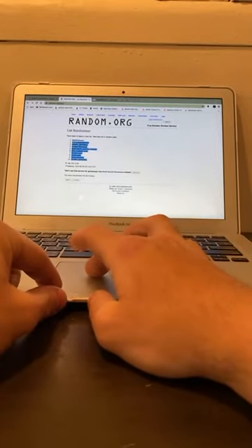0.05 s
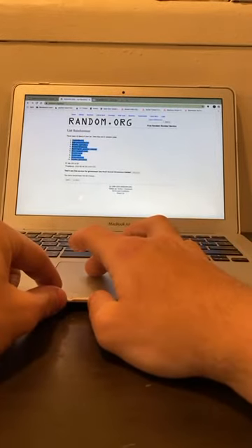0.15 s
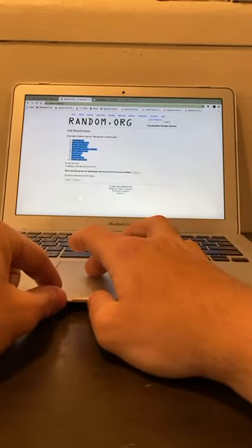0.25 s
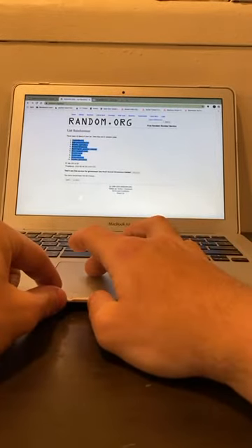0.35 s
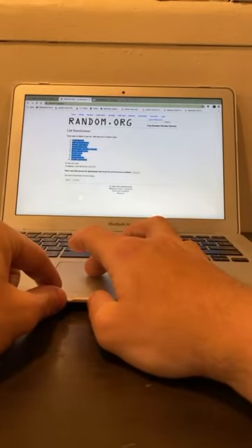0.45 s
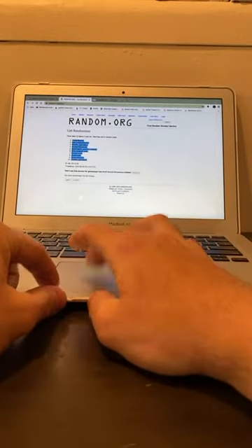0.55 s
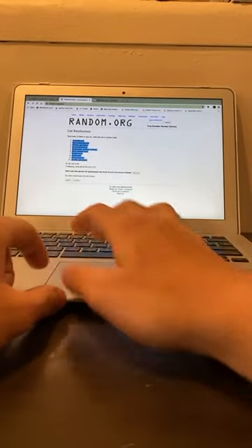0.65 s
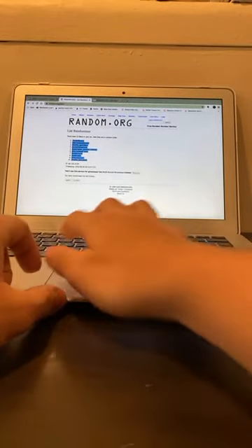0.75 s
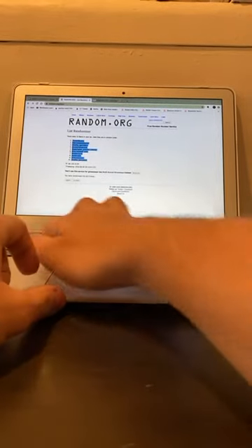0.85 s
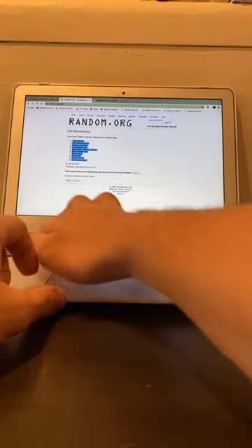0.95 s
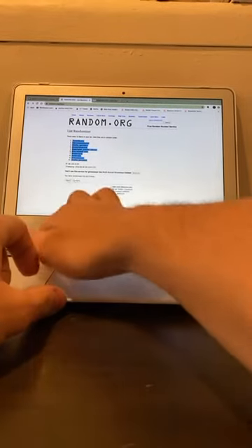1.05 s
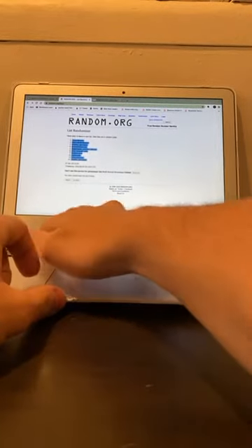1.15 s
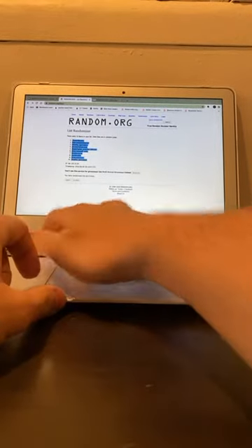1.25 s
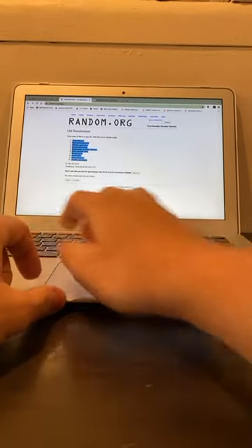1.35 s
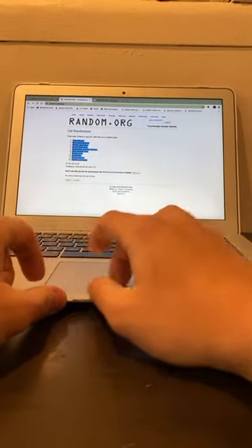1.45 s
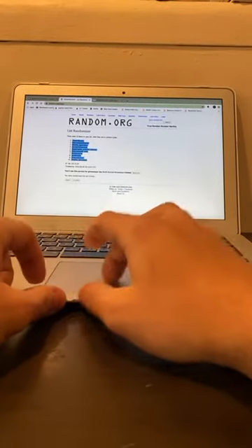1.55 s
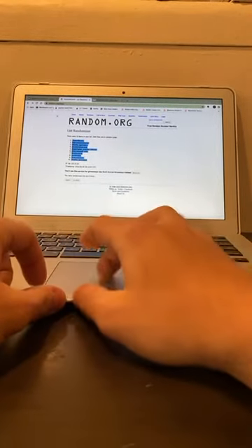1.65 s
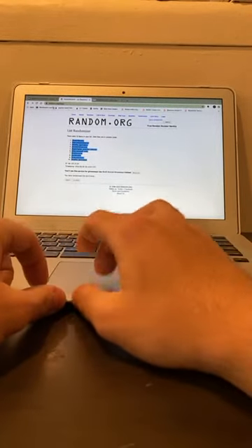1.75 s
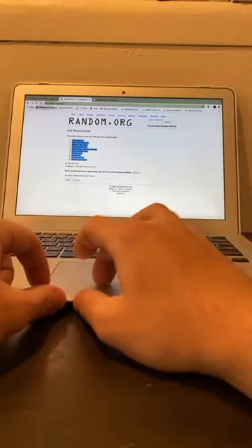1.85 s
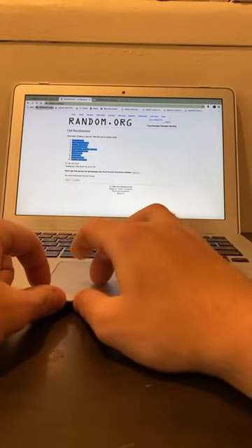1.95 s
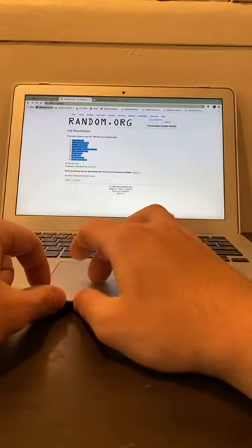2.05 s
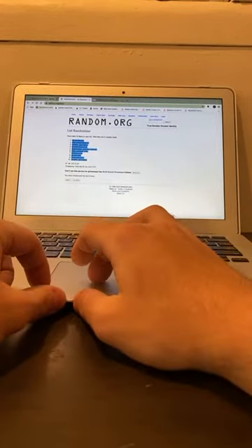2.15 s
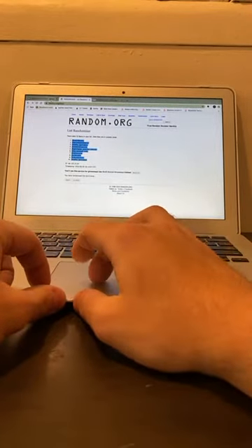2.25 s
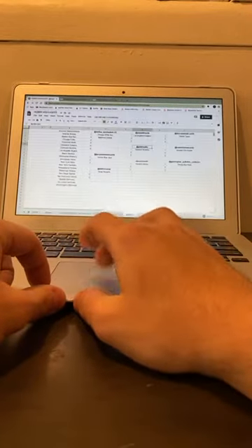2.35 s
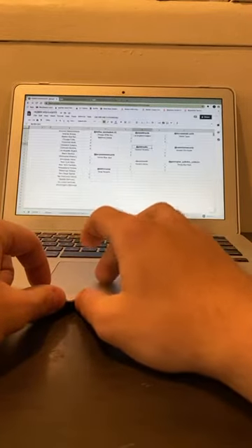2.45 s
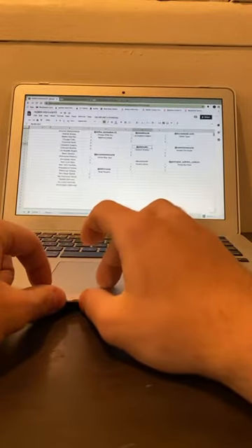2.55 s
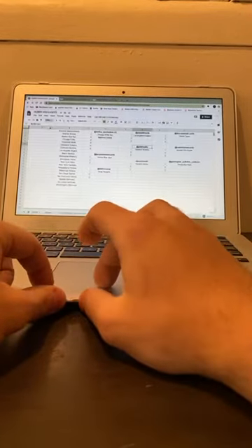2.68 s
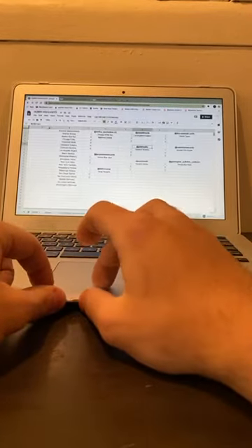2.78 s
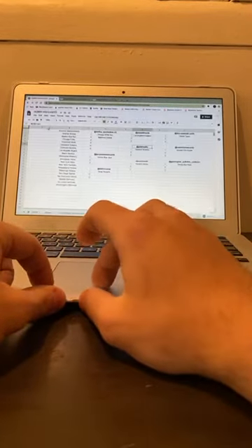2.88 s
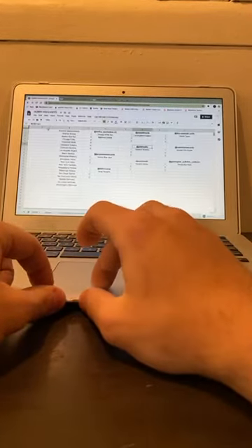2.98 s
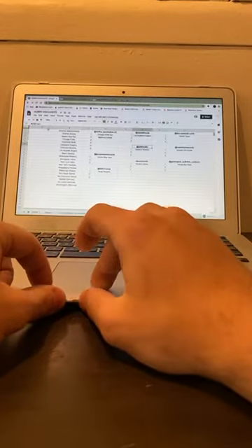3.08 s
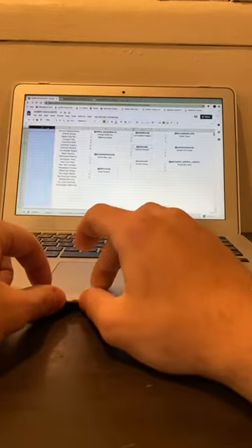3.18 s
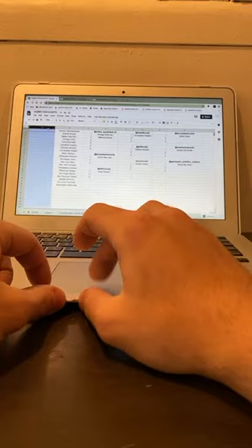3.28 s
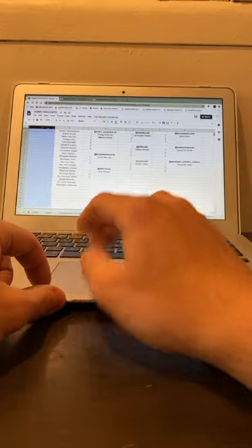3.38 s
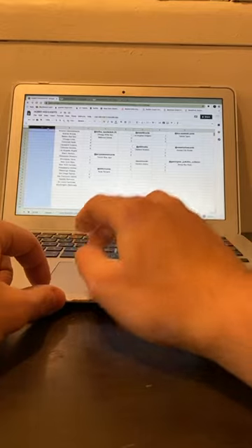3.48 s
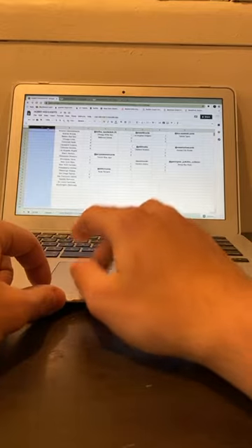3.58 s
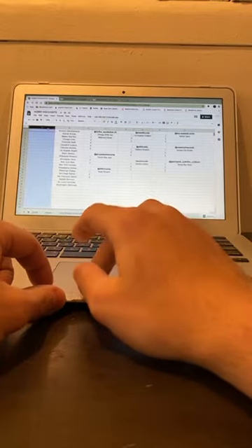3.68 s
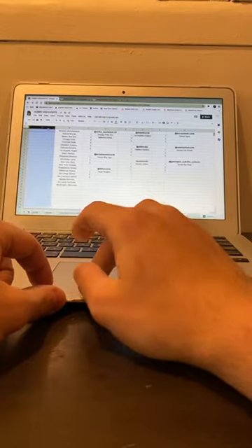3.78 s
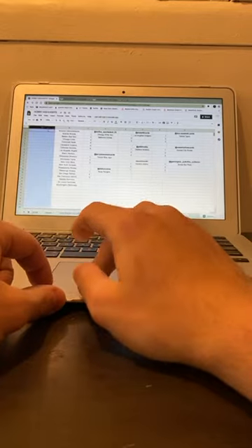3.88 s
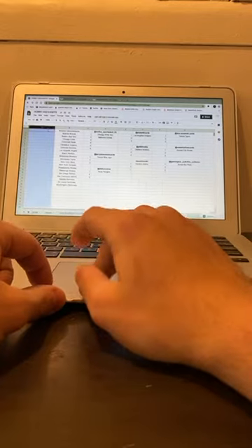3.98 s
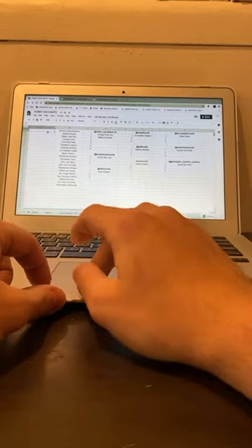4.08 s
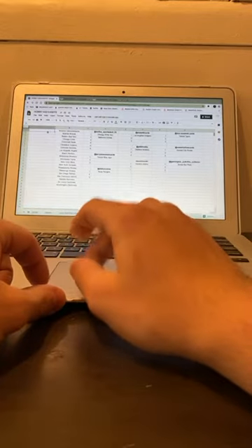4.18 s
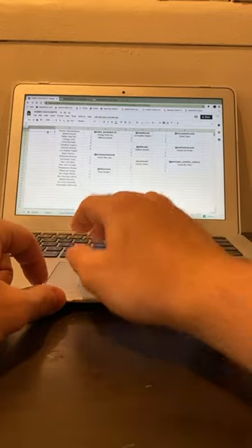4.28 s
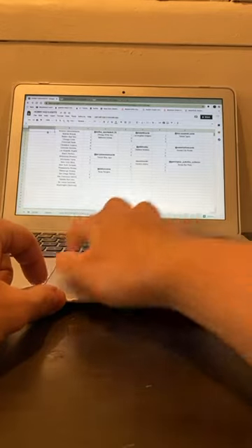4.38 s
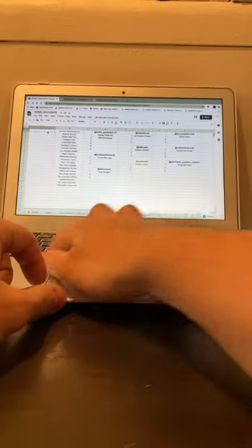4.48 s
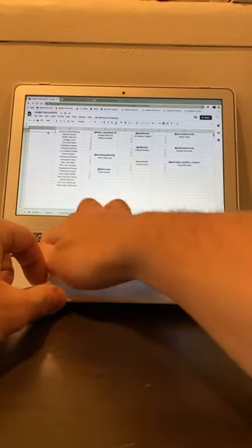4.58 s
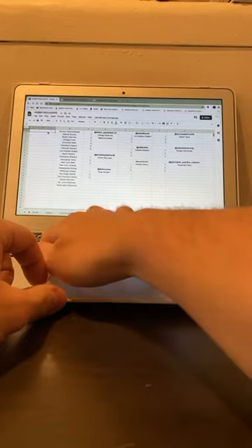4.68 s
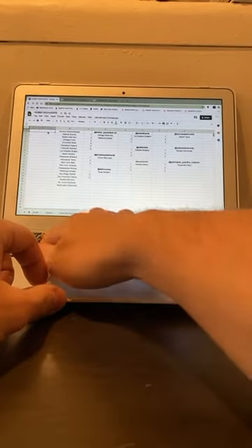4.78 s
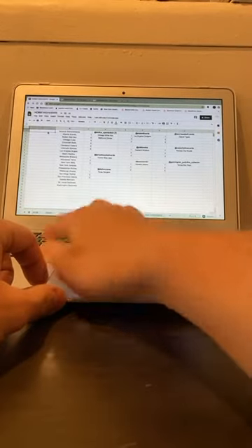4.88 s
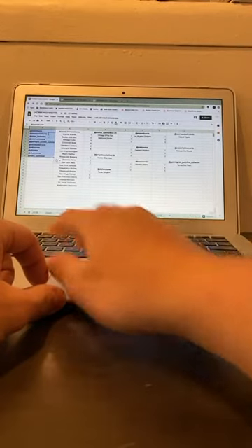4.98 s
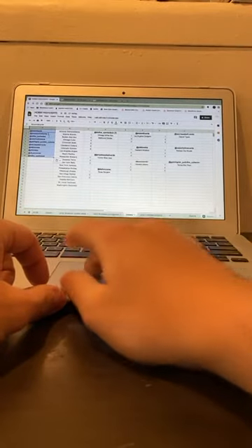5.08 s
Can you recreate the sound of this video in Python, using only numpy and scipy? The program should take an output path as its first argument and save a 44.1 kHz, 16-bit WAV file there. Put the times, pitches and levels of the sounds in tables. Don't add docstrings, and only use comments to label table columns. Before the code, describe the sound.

Sparse laptop key presses, three crisp trackpad clicks, dry skin slides and soft desk thumps in a quiet room with a low pulsing hum.

```python
import sys
import numpy as np
from scipy import signal
from scipy.fft import rfft, irfft
from scipy.io import wavfile
from scipy.ndimage import uniform_filter1d

SR = 44100
rng = np.random.default_rng(int(sys.argv[2]) if len(sys.argv) > 2 else 0)


def inscribe(sig):
    pcm = np.round(np.clip(np.atleast_2d(sig).T, -1, 1) * 32767)
    wavfile.write(sys.argv[1], SR, pcm.astype(np.int16))


def decibels_to_gain(level_db):
    exponent = np.asarray(level_db, float) / 20
    return 10 ** exponent


N = 226363
TIME = np.arange(N) / SR


def unit(x):
    return x / np.sqrt(np.mean(x ** 2))


def colour(x, points):
    hz, db = np.transpose(points)
    bins = np.maximum(np.arange(len(x) // 2 + 1) * SR / len(x), 1)
    gain = decibels_to_gain(np.interp(np.log(bins), np.log(hz), db))
    return irfft(rfft(x) * gain, len(x))


def hiss(points):
    return unit(colour(rng.standard_normal(N), points))


def walk(rate):
    hold = int(SR / rate)
    steps = np.repeat(rng.standard_normal(N // hold + 1), hold)
    slewed = uniform_filter1d(uniform_filter1d(steps, hold), hold)
    return 1.3 * slewed[:N]


def fall(t60, t):
    return np.exp(-np.log(1000) * t / t60)


def ring(hz, t60, t):
    return np.sin(2 * np.pi * hz * t) * fall(t60, np.maximum(t, 0)) * (t > 0)


def add(out, s, x):
    i = int(s * SR)
    out[i:i + len(x)] += x[:N - i]


def trackpad():
    # snap in seconds, peak level in dB.
    snaps = [
        (2.0878, -32.5),
        (2.929, -34),
        (3.894, -34),
    ]
    # frequency in Hz, level in dB, t60 in seconds.
    plate = [(1010, -13, 0.058), (1110, -11, 0.063), (440.6, 0, 0.036), (2010, -1, 0.021),
             (2300, -8, 0.048), (3150, 8, 0.011), (3474, 0, 0.023), (4260, -3, 0.022), (5050, -3, 0.021),
             (5600, 5.5, 0.0092), (6680, -4, 0.009), (7440, -17, 0.0034), (8440, -6, 0.012),
             (11640, -4, 0.0036)]
    crack_colour = [(500, 2), (1500, 7.0), (3000, 3), (8500, 3.5), (11000, -13), (16000, -30)]
    out, t = np.zeros(N), TIME[:SR // 8]
    first_crack = np.exp(-t / 0.0032)
    bounce = 0.75 * np.exp(-np.abs(t - .009) / 0.0011)
    loose_tail = 0.21 * np.exp(-t / 0.028)
    shake = first_crack + bounce + loose_tail
    for s, db in snaps:
        modes = np.zeros(len(t))
        for hz, mode_db, t60 in plate:
            level_chance, pitch_chance = rng.standard_normal(2)
            late = 2.638 / hz
            pitch = hz * (1 + 0.0041 * pitch_chance)
            modes += decibels_to_gain(mode_db + 0.35 * level_chance) * ring(pitch, t60, t - late)
        crack = shake * unit(colour(rng.standard_normal(len(t)), crack_colour))
        add(out, s - .0004, decibels_to_gain(db + 1.5) * (modes / np.abs(modes).max() + decibels_to_gain(-13.5) * crack))
    return out


def keys():
    # time in seconds, peak level in dB, keycap ring in Hz, knock in dB.
    presses = [
        (1.0357, -36.5, 6100, -14.5),
        (1.0437, -37.5, 7760, -12),
        (4.3848, -44, 6670, -27),
        (4.3994, -44.5, 6500, -33),
        (4.629, -43.5, 8300, -19),
        (4.6382, -43.5, 8250, -35),
    ]
    # time in seconds, peak level in dB, keycap ring in Hz, knock in dB.
    releases = [
        (0.843, -47.5, 8100, -57),
        (0.8522, -61.5, 8000, -1.5),
        (1.129, -60, 7510, -5),
        (1.1348, -49, 7150, -19),
        (1.1688, -52.5, 6620, -19),
        (1.185, -66, 7870, -21),
        (4.7154, -63, 9200, -17),
        (4.7232, -51, 8300, -14),
        (4.7463, -57, 7200, -22),
    ]
    # time in seconds, peak level in dB, case ring in Hz, knock in dB.
    touches = [(0.2128, -54, 3180, -25), (0.377, -56, 4500, -18), (0.4438, -45, 3100, -20),
               (0.818, -46, 2640, -5.5), (1.638, -45, 2620, -30), (2.306, -54.5, 6000, -13),
               (2.3844, -55, 2730, -22), (3.275, -41, 3140, -17.5), (3.5764, -54, 4010, -20),
               (4.0307, -52, 6300, -25), (4.0914, -47, 2680, -20), (4.4944, -63.5, 4000, -2)]
    down = ticks(presses, ring_db=7.5, bright_db=-5, top_db=-10.5, rise=.0015, rattle=0.0077)
    up = ticks(releases, ring_db=5.5, bright_db=-4.5, top_db=-7.5, rise=0.0023, rattle=0.017)
    taps = ticks(touches, ring_db=4, bright_db=-15.5, top_db=-28, rise=.003, rattle=0.0051)
    return down + up + taps


def ticks(table, ring_db, bright_db, top_db, rise, rattle):
    out, t = np.zeros(N), TIME[:SR // 8]
    for s, db, hz, knock_db in table:
        noise = rng.standard_normal((3, len(t)))
        grit = noise[0] * decibels_to_gain(2.0 * unit(uniform_filter1d(noise[1], size=40)))
        shake = grit * np.exp(-t / max(rattle, .001)) * np.minimum(t / rise, 1)
        low = [(1200, -30), (2600, 0.23 * knock_db)]
        peak = [(0.98 * hz, 0), (hz, ring_db), (1.12 * hz, 0)]
        high = [(9300, bright_db), (10800, top_db), (16000, top_db - 11)]
        body = colour(shake, sorted(low + peak + high))
        thud = noise[2] * np.exp(-t / 0.0045) * np.minimum(t / 0.0032, 1)
        knock = colour(thud, [(400, -13), (750, -2), (1500, 1.5), (2400, -7), (3300, -25)])
        add(out, s - .001, decibels_to_gain(db) * (body + decibels_to_gain(knock_db + 18.0) * knock))
    return out


def pings():
    # start in seconds, level in dB, frequency in Hz, t60 in seconds.
    lone_modes = [(0.825, -49, 328, 0.18), (1.054, -56, 253, 0.67), (1.135, -60, 1407, .06),
                  (4.386, -54.5, 2380, 0.031), (4.388, -55, 5600, .04), (4.628, -54.5, 1660, 0.029),
                  (4.632, -46.5, 5050, 0.015), (4.639, -57, 8770, 0.035), (4.724, -58.5, 1410, 0.051),
                  (4.776, -54, 317, 0.19), (4.929, -58.5, 301, 0.14)]
    out, t = np.zeros(N), TIME[:SR // 3]
    for s, db, hz, t60 in lone_modes:
        soft_start = np.minimum(t * hz / 2, 1)
        add(out, s, decibels_to_gain(db) * ring(hz, t60, t) * soft_start)
    return out


def skin():
    # full speed from in seconds, held in seconds, level in dB, speed-up in seconds, dull part in dB.
    slides = [(.44, .05, -74.5, 0.11, 5.5), (.545, 0.07, -49, 0.082, -11.5), (.74, .28, -69.5, 0.18, 1),
              (1.32, 0.076, -54, 0.027, -16.5), (1.52, .09, -75.5, 0.053, -6),
              (1.645, 0.0042, -62.5, 0.014, -6), (3.347, 0.036, -61, 0.077, -15),
              (3.53, 0.084, -78, 0.038, -3), (4.164, 0.046, -52.5, 0.11, -19),
              (4.28, 0.054, -74, 0.027, -22), (4.42, 0.093, -72.5, .04, 0), (4.93, 0.11, -60, 0.044, -15)]
    # frequency in Hz, level in dB per Hz.
    skin_colour = [(1060, -17), (1800, -7.5), (2230, -8.5), (2550, -0.5), (3300, -3), (3660, 0.5),
                   (6450, -2.5), (7000, -1.5), (8290, -3), (10500, -14.5), (13600, -41), (22000, -120)]
    slow_down_s, swell_db = 0.052, 26.5
    arch_db = 2
    bright, dull = np.zeros((2, N))
    for s, held, db, speed_up, dull_db in slides:
        before = np.maximum((s - TIME) / speed_up, 0)
        after = np.maximum((TIME - s - held) / slow_down_s, 0)
        lost = np.minimum(before + after, 4)
        off_middle = np.minimum(np.abs(2 * (TIME - s) / held - 1), 1)
        drag = decibels_to_gain(db - swell_db * lost - arch_db * off_middle ** 2)
        bright += drag
        dull += decibels_to_gain(dull_db) * drag
    flutter = decibels_to_gain(.4 * walk(40))
    grain = flutter * decibels_to_gain(1.23 * walk(120) + 0.77 * walk(900))
    airy = decibels_to_gain(-16) * hiss([(8500, -49), (10000, -2), (14000, -9), (16000, -11)])
    bright_hiss = hiss(skin_colour) + airy
    dull_hiss = hiss([(250, 7.5), (600, 4), (2000, -3.0), (2600, -55)])
    return grain * (bright * bright_hiss + dull * dull_hiss)


def squeak():
    # start in seconds, held in seconds, pitch in Hz, level in dB.
    squeaks = [
        (.74, .3, 4300, -78),
        (.78, .12, 8450, -75),
        (3.95, .34, 4620, -84),
    ]
    # (share of the pitch, dB)
    shape = np.array([(.9, -40), (.975, -10), (1, 0), (1.025, -10), (1.1, -40)])
    out = np.zeros(N)
    for s, length, hz, db in squeaks:
        fade = np.clip(np.minimum(TIME - s, s + length - TIME) / .03, 0, 1)
        out += decibels_to_gain(db) * fade * hiss(shape * [hz, 1])
    patchy = decibels_to_gain(1.2 * walk(74))
    return patchy * out


def desk():
    # push in seconds, peak level in dB, legs in dB, case in dB.
    blows = [(0.395, -53, 9.5, -10), (0.467, -43.5, -21, -4), (0.555, -50.5, -8, -21),
             (0.819, -65.5, 7, 17.5), (0.857, -47, 2, -16), (0.963, -62, 3, 6), (1.037, -43, 1, -32),
             (1.046, -35, 9, -4.5), (1.15, -43, 5.5, -14), (1.387, -33, 1.5, -36), (1.563, -52, -16, -36),
             (1.725, -34, 0.5, -28), (1.96, -51, -17, -18), (2.014, -63, -13, 7.5),
             (2.087, -46.5, -26, -0.5), (2.174, -40.5, -31, -8.5), (2.319, -36, -3, -33),
             (2.928, -46.5, 4, -1.2), (3.11, -42.5, 5.5, -8), (3.528, -41, 7.5, -49),
             (3.893, -51.5, 10, 6.5), (4.022, -42, -12, -4), (4.469, -51.5, -4, -11),
             (4.639, -46, 4.5, -14), (4.731, -47, 5, -16), (4.789, -57.5, 2.2, -8), (4.944, -55, 3, -12),
             (5.033, -50, -16, -37)]
    # frequency in Hz, level in dB, swell in seconds, arrival in seconds.
    top_modes = [(88, -12, .03, .008), (94, 0, .008, .0135), (105, -3, .015, .002)]
    # frequency in Hz, level in dB, swell in seconds, arrival in seconds.
    leg_modes = [(56, 0, .0105, .0285)]
    # frequency in Hz, level in dB, swell in seconds, arrival in seconds.
    lid_modes = [(145.5, 5.5, 0.014, 0.00686), (192.2, -9, 0.018, 0.00707)]
    # frequency in Hz, level in dB, swell in seconds, arrival in seconds.
    case_modes = [(249.1, -1, 0.014, 0.006), (273.5, -12, 0.0027, 0.00442), (307.5, -1, 0.0076, 0.005),
                  (380, -2.5, 0.005, 0.00366), (444, -6, 0.011, 0.00259), (572, -3.5, 0.0027, 0.0018)]
    wood, metal = np.zeros((2, N))
    t = TIME[:SR // 2]

    def swings(modes):
        return np.array([decibels_to_gain(db) * swing(hz, swell, t - lag) for hz, db, swell, lag in modes])

    top, legs, lid = swings(top_modes).sum(0), swings(leg_modes).sum(0), swings(lid_modes).sum(0)
    case = swings(case_modes)
    for s, db, legs_db, case_db in blows:
        lid_db = -6 + 0.29 * case_db
        add(wood, s - .006, decibels_to_gain(db) * (top + decibels_to_gain(legs_db) * legs + decibels_to_gain(lid_db) * lid))
        favour_db = 2.0 * rng.standard_normal(len(case))
        add(metal, s - .006, decibels_to_gain(db + case_db - 9.0 + favour_db) @ case)
    return wood, metal


def swing(hz, swell, t):
    u = np.maximum(t, 0) / swell
    return u * np.exp(1 - u) * np.sin(2 * np.pi * hz * swell * u)


def hum():
    # time in seconds, level in dB.
    motor_load = [(0, -64), (.5, -58), (.85, -51), (1.3, -47.5), (1.8, -53.5), (2.15, -50), (2.5, -54.5),
                  (2.85, -52), (3.2, -53), (3.5, -46), (3.9, -50), (4.2, -48.5), (4.5, -59), (4.8, -52.5),
                  (5.13, -48)]
    # frequency in Hz, level in dB per Hz.
    rumble_colour = [(20, -43), (30, -19.5), (40, 19), (50, 5.5), (62, 7.5), (75, -35.5)]
    motor_hz, other_hz, mains_hz = 58.85, 65.1, 120
    beat_lag_s = 0.00038
    s, db = np.transpose(motor_load)
    slow = decibels_to_gain(np.interp(TIME, s, db)) * np.cos(2 * np.pi * motor_hz * TIME)
    other = decibels_to_gain(-54 + 0.94 * walk(2.2)) * np.cos(2 * np.pi * other_hz * (TIME - beat_lag_s))
    mains = decibels_to_gain(-70 + 1.5 * walk(4)) * np.cos(2 * np.pi * mains_hz * TIME)
    rumble = decibels_to_gain(-60 + 0.87 * walk(3.0)) * hiss(rumble_colour)
    return np.sqrt(2) * (slow + other + mains) + rumble


def air():
    # frequency in Hz, level in dB per Hz.
    low_colour = [(41, -31), (70, -5), (79, -15.5), (92, -10), (128, -21), (140, -27.5), (167, -26),
                  (193, -32), (326, -27.5), (416, -33.5), (1320, -41.5), (1500, -45.5), (1950, -85),
                  (3300, -120)]
    # frequency in Hz, level in dB per Hz.
    high_colour = [(880, -24), (1500, -2.5), (1860, 0), (5280, -7.5), (6820, -7.5), (7370, -9.5),
                   (8060, -8.5), (13000, -29.5), (14900, -36), (15350, -55)]
    low = decibels_to_gain(-57 + .7 * walk(9)) * hiss(low_colour)
    return low + decibels_to_gain(-73) * hiss(high_colour)


def room_echo():
    t60_s, tail_db = 0.13, -6
    t = TIME[:SR // 3]
    noise = rng.standard_normal(len(t))
    lasting = colour(noise, [(8000, 2.3), (11000, 7.9)])
    treble = (noise - lasting) * np.exp(-t / 0.021)
    tail = (lasting + treble) * fall(t60_s, t) * np.minimum(t / 0.0042, 1)
    return np.r_[1, decibels_to_gain(tail_db) * tail / np.sqrt(np.sum(tail ** 2))]


def scene():
    # frequency in Hz, level in dB.
    port = [(7000, 0.5), (8400, 1.5), (9500, 0)]
    wood, case = desk()
    close = trackpad() + keys() + pings() + case + skin() + squeak()
    wet = signal.fftconvolve(close, room_echo())[:N]
    return (colour(wet, port) + wood + hum() + air())[None]


def roll_off(x):
    return signal.sosfilt(signal.butter(12, 15870, fs=SR, output="sos"), x)


def record(dry):
    low_cut = signal.butter(4, 40, "high", fs=SR, output="sos")
    top_cut = signal.butter(8, 15300, fs=SR, output="sos")
    heard = signal.sosfilt(np.vstack([low_cut, top_cut]), dry)
    return roll_off(heard)


dry = scene()
out = record(dry)
inscribe(out)
```